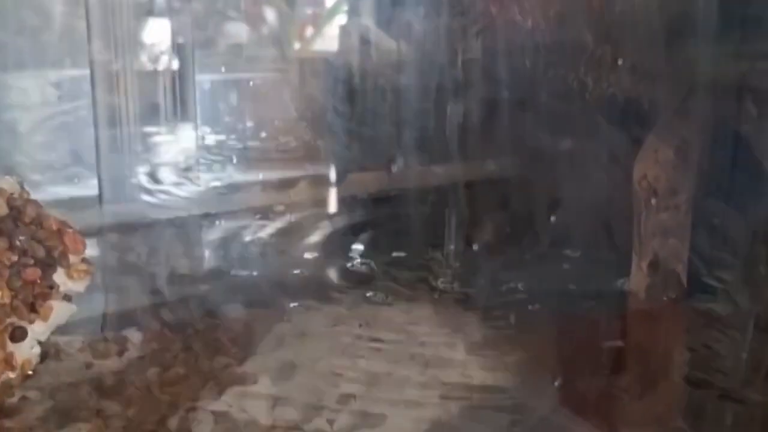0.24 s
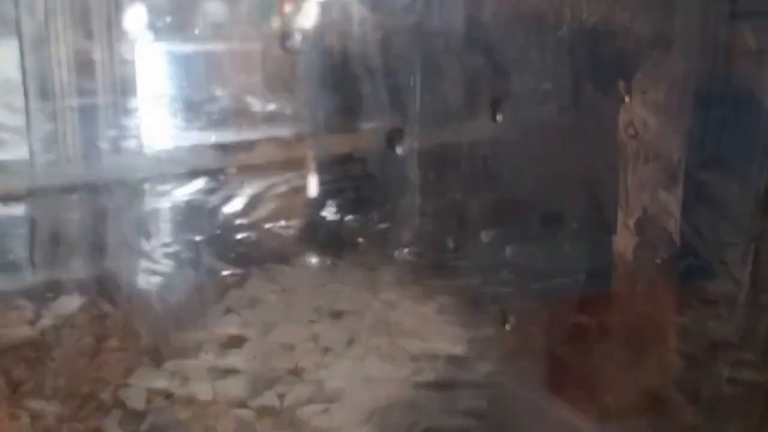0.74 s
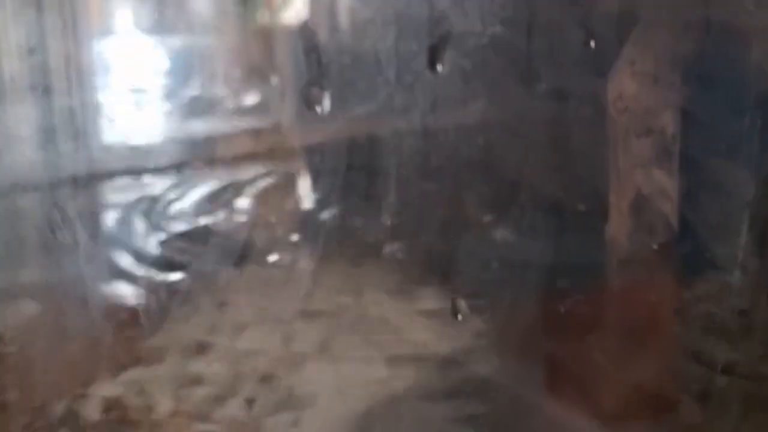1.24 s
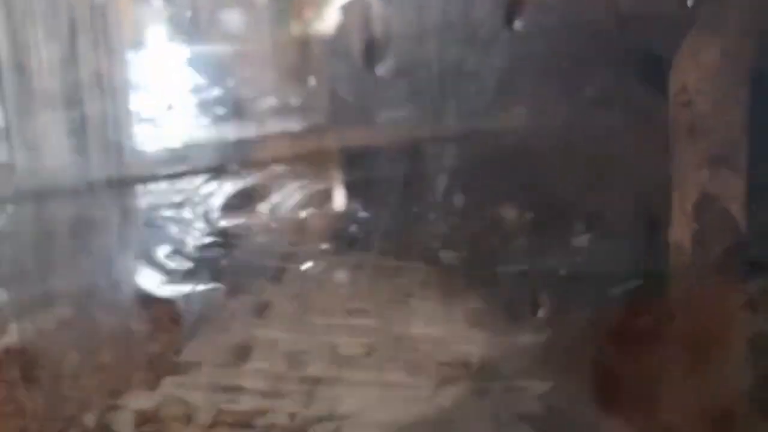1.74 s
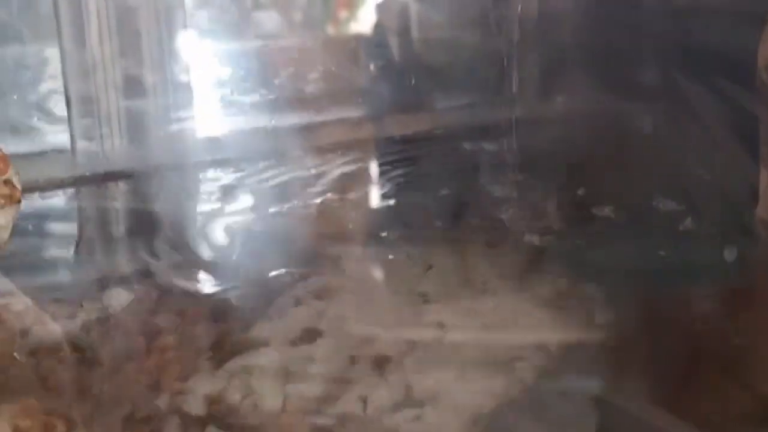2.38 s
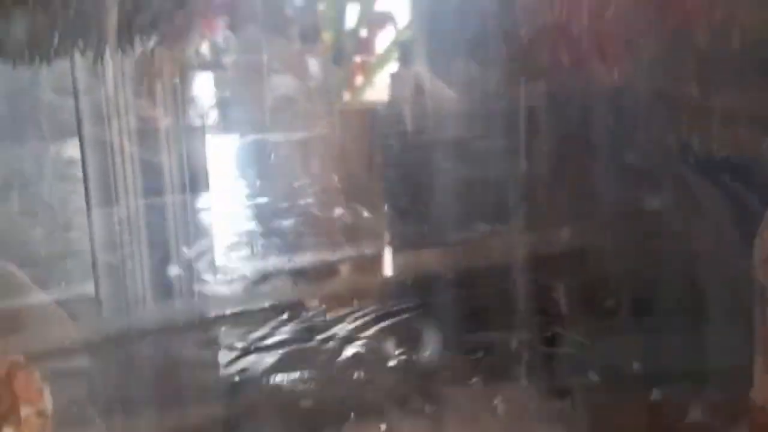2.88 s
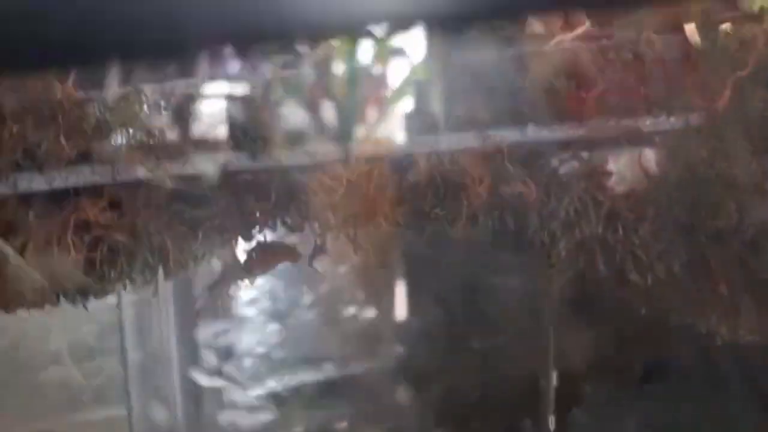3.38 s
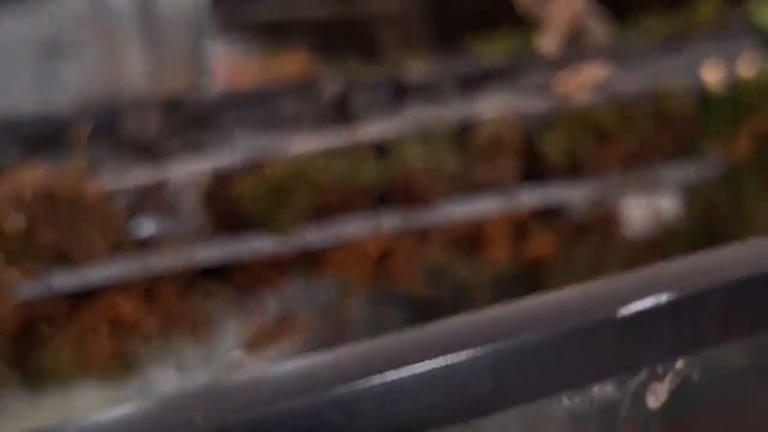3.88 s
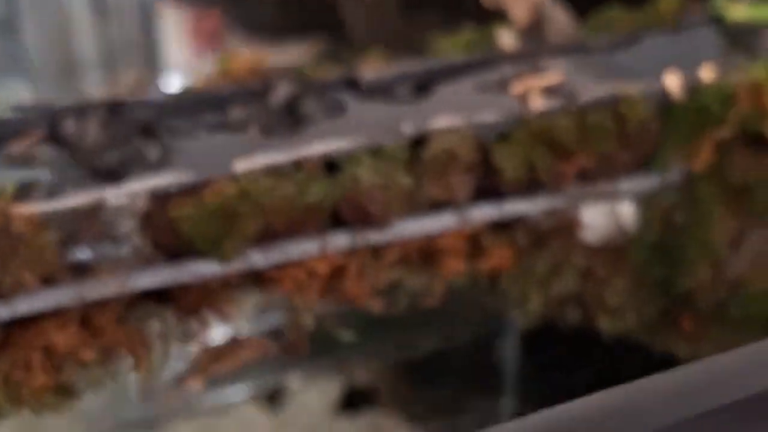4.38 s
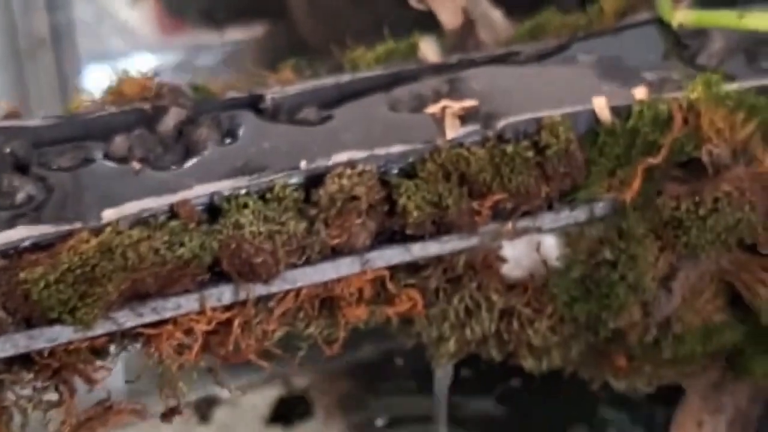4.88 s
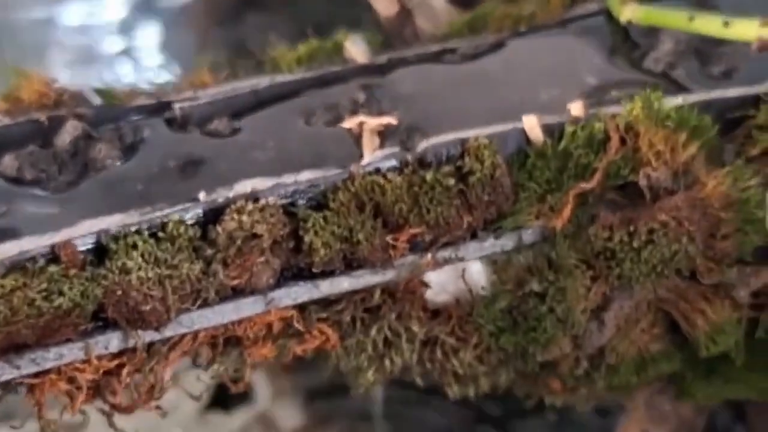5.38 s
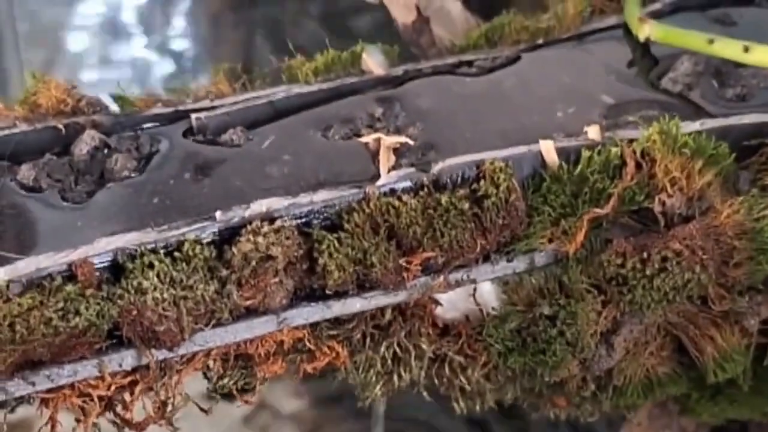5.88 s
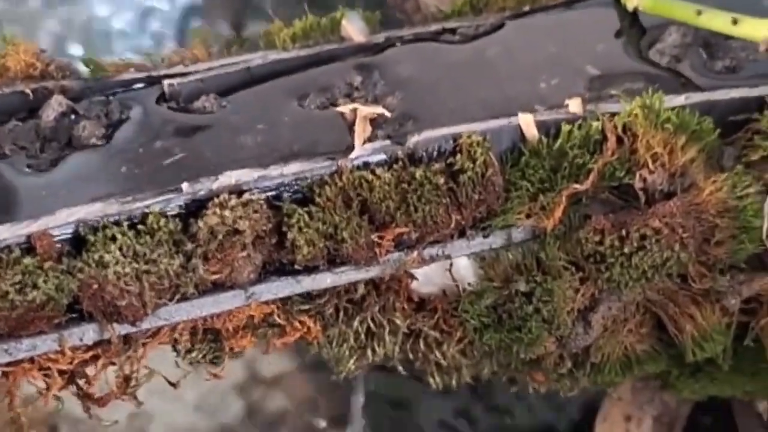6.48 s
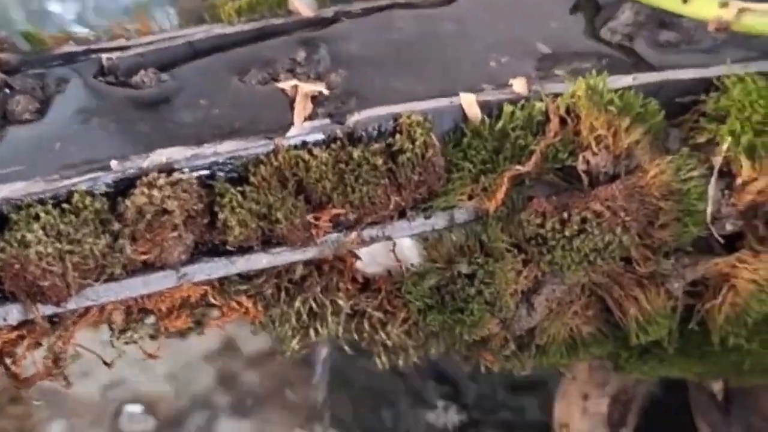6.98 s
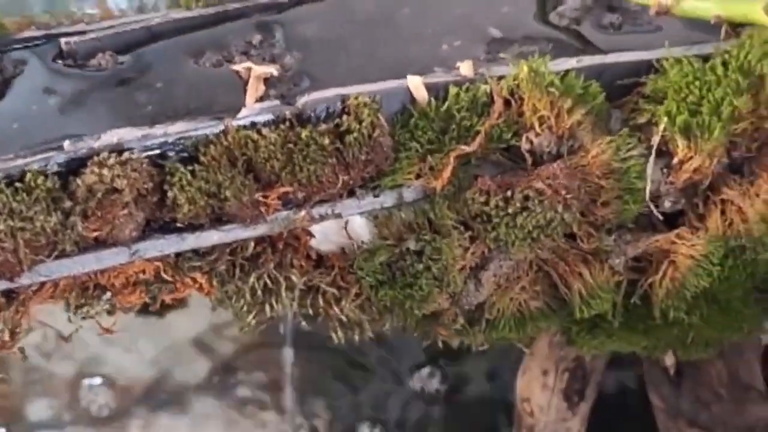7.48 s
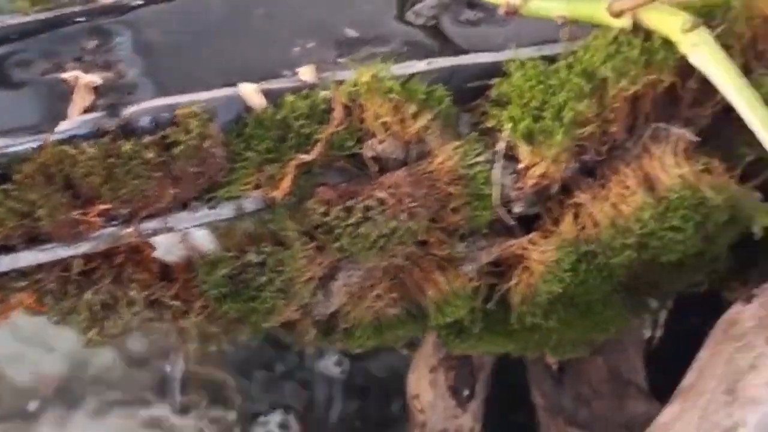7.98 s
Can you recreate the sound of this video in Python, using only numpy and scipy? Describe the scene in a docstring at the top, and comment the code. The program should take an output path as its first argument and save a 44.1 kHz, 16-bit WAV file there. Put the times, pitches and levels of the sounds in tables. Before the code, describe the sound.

A trickle falls into a water tank in a room, heard very near over a quiet, steady pump hum and low rumble. Separate bubbly drops come first, dulled by the glass, with soft thuds from a hand on the microphone and a single hollow knock. After a louder bump and a rub, the dripping turns dense, crisp and spattering, mostly on the left, while the hand ticks the microphone twice on the right.

```python
"""At a glass tank, close up: water trickles in from a mossy ledge, each drop splashing and trapping
bubbles that ring between the walls. A hand-held two-port microphone rises from beside the glass
to above the open top, where the water is brighter. The left port faces the water; the right lies
under the hand, which rubs, bumps and twice ticks the housing. Something hollow is knocked once.
Behind it all, a mains pump hums and the room rumbles."""
import sys
import numpy as np
from scipy import signal
from scipy.fft import rfft, irfft, next_fast_len
from scipy.io import wavfile

SR = 44100
rng = np.random.default_rng(int(sys.argv[2]) if len(sys.argv) > 2 else 0)


def transcribe(signal):
    """Save signal, clipped to [-1, 1], as a 16-bit WAV file at the path in sys.argv[1]."""
    frames = np.atleast_2d(signal).T
    limited = np.clip(frames, -1, 1)
    pcm = np.round(limited * 32767).astype(np.int16)
    wavfile.write(sys.argv[1], SR, pcm)


N = 363384
TIME = np.arange(N) / SR

# The microphone's rise: time_s, hiss_db, openness (0 behind glass, 1 above the tank), rumble_db
# hiss_db is fine water spatter, swelling with the hand's rubbing hiss at about 4.0-4.5 s
MIC_PATH = [(0.0, -68, .6, -68), (.25, -74.5, 0.51, -72), (.45, -75.5, 0.37, -64.5),
            (1.1, -77.5, 0.24, -62.5), (2.0, -74, 0.21, -62.5), (2.8, -82.5, 0.29, -61),
            (3.4, -73.5, 0.53, -61), (4.0, -69, 0.71, -54.5), (4.15, -55.5, 0.76, -47.5),
            (4.42, -59.5, 0.86, -57), (4.65, -65, 0.85, -54.5), (5.2, -70, 0.84, -58),
            (5.65, -64, 0.95, -55.5), (6.0, -72.5, 0.85, -58), (6.9, -68.5, 1, -55.5),
            (7.6, -70.5, 0.77, -59.5), (8.24, -65, 0.98, -57)]
# Single drops: start_s, level_db, pitch_hz, splash_db (4-9 kHz), top_db (above 9 kHz)
DROPS = [(0.071, -40, 2560, -50, -64), (0.2597, -40, 2640, -65, -76), (.5232, -43, 2120, -53.5, -78),
         (1.0423, -51, 1030, -59, -74), (1.2593, -43.5, 1944, -71, -81), (1.3764, -55, 1835, -59, -77),
         (1.5464, -51, 1780, -69, -63), (1.56, -49, 4600, -79, -80), (1.93, -44, 1900, -61, -82),
         (2.0495, -48, 2450, -56, -78), (2.309, -44.5, 2670, -49.5, -72), (2.395, -44.5, 3226, -80, -70),
         (2.4094, -49, 1920, -74, -77), (2.576, -55, 1970, -81, -84), (2.641, -61, 1950, -78, -82),
         (2.673, -59, 1740, -87, -82), (2.715, -61, 1950, -78, -82), (2.78, -56, 1880, -60, -82),
         (2.9087, -41.5, 1976, -59, -86), (2.923, -46, 1740, -66, -83), (2.963, -51, 1760, -59, -71),
         (2.98, -45, 2500, -55, -72), (3.0312, -43, 2610, -54, -81), (3.0587, -50, 4200, -66, -82),
         (3.2213, -53, 4370, -68, -82), (3.25, -42.5, 2420, -54.5, -82), (3.345, -43, 1470, -82, -84),
         (3.4087, -46, 1973, -59, -76), (3.5302, -32, 1445, -53.5, -56), (3.5655, -51, 3630, -72, -78),
         (3.693, -37.5, 2610, -47, -50), (3.7989, -56, 4670, -61, -70), (3.889, -49, 1370, -76, -62),
         (3.904, -51, 1930, -76, -73), (4.0572, -38.5, 1970, -46, -60), (4.135, -50, 1350, -44, -43),
         (4.4007, -36, 6270, -53, -65), (4.5405, -37, 3970, -42, -50), (4.6905, -40, 4810, -65, -84),
         (4.705, -47, 2700, -62, -72), (4.739, -44, 3050, -44, -73), (4.8503, -36, 7170, -51, -51),
         (4.9043, -37, 1784, -53, -74), (4.9427, -41, 6470, -48, -56), (4.976, -43.5, 2140, -63, -72),
         (5.0074, -35, 3990, -48, -55), (5.025, -38, 3500, -51, -70), (5.04, -35, 1695, -45, -50),
         (5.0827, -43, 1316, -45.5, -64), (5.169, -46.5, 7200, -66, -57), (5.227, -49, 2170, -48.5, -60),
         (5.273, -44.5, 2920, -48, -55), (5.3404, -54, 1277, -73, -59), (5.3516, -52, 1940, -82, -72),
         (5.4007, -51, 1940, -41, -39), (5.5393, -37.5, 1700, -40, -55), (5.5748, -38.5, 1880, -40, -38),
         (5.6337, -42.5, 2750, -43, -51), (5.7123, -45, 2960, -71, -71), (5.7464, -39, 960, -44.5, -51),
         (5.84, -48.5, 2260, -67, -69), (5.8566, -46, 2310, -57, -53), (5.878, -44, 4700, -64, -44),
         (5.8986, -34, 3370, -44, -46), (5.945, -48, 4630, -66, -70), (5.969, -46.5, 1810, -59, -63),
         (5.996, -38, 4090, -61, -72), (6.0137, -38.5, 2290, -71, -73), (6.0145, -34.5, 2890, -71, -73),
         (6.0442, -50, 4300, -71, -64), (6.0754, -44, 1740, -72, -62), (6.0966, -33.5, 3170, -71, -69),
         (6.18, -52, 4020, -49, -58), (6.199, -55, 3200, -70, -70), (6.207, -49.5, 1235, -67, -58),
         (6.225, -47, 2100, -47, -44), (6.2398, -31, 6570, -60, -50), (6.3157, -40, 1620, -53, -57),
         (6.3374, -38, 2940, -58, -68), (6.3735, -41, 2790, -53, -73), (6.3885, -35, 3370, -46, -73),
         (6.4699, -42.5, 1230, -76, -65), (6.536, -41, 3280, -52, -69), (6.563, -45, 2260, -43, -76),
         (6.5967, -51, 3010, -68, -60), (6.63, -29, 2790, -34, -44), (6.739, -71, 4530, -55, -74),
         (6.776, -53, 2260, -45.5, -41.5), (6.8, -48, 2970, -43, -64), (6.814, -32.5, 3210, -33.5, -55),
         (6.8197, -46, 5730, -33, -70), (6.849, -41, 4170, -42.5, -47), (6.862, -32.5, 1910, -60, -70),
         (6.8688, -30, 1990, -59, -54), (6.907, -56, 1580, -61, -72), (6.9614, -39.5, 1690, -66, -52),
         (7.002, -46.5, 3880, -51, -51), (7.0582, -51, 1660, -74, -66), (7.098, -48, 2940, -55, -50),
         (7.1297, -37.5, 2190, -50, -70), (7.158, -42, 5070, -69, -77), (7.2408, -43, 2390, -54, -65),
         (7.286, -39, 1120, -44.5, -48), (7.3608, -40.5, 2360, -51, -49), (7.421, -37.5, 3430, -48, -47),
         (7.425, -49, 1250, -70, -70), (7.4603, -43.5, 1146, -60, -56), (7.5508, -42.5, 2130, -52, -53),
         (7.599, -46.5, 1550, -47, -64), (7.644, -40, 2750, -66, -57), (7.6587, -41.5, 2950, -56, -72),
         (7.675, -38, 2740, -41, -67), (7.7394, -43.5, 1190, -70, -47), (7.7632, -40, 3020, -47.5, -57),
         (7.8226, -41.5, 1173, -76, -58), (7.896, -51, 1730, -49.5, -48), (7.9348, -49, 2100, -48, -66),
         (7.963, -42, 3800, -57, -70), (7.993, -43, 2600, -57, -70), (8.004, -44.5, 1890, -57, -67),
         (8.11, -38.5, 1083, -47, -50), (8.1628, -40.5, 2270, -44.5, -54)]
# Droplets bursting near the left port: start_s, level_db, centre_hz
SPITS = [(3.6925, -47, 15100), (3.895, -51, 14700), (3.9938, -48, 14700), (4.8534, -41, 14500),
         (4.9447, -51, 9300), (5.1716, -48, 12600), (5.3413, -34, 14700), (5.449, -57, 14400),
         (5.5388, -46, 13100), (5.6206, -39, 15200), (5.7488, -50, 13100), (5.8875, -39, 12700),
         (6.0691, -48, 15300), (6.1953, -42, 15000), (6.2253, -36, 15800), (6.316, -54, 12400),
         (6.631, -38.5, 13900), (6.776, -53, 15500), (6.8344, -46, 12600), (6.9531, -52, 14200),
         (7.0174, -47, 14400), (7.0828, -48, 13200), (7.2434, -50, 15000), (7.2863, -45, 15100),
         (7.3043, -44, 15000), (7.3712, -44.5, 10900), (7.4205, -42.5, 12500), (7.453, -40, 15000),
         (7.5058, -47.5, 9430), (7.6231, -46, 15100), (7.7373, -35, 15300), (7.8341, -45, 14800),
         (7.9279, -43, 14300), (8.0895, -45, 13000), (8.1618, -49, 12700)]
# Spectrum of the flickering hiss: frequency_hz, level_db
HISS_COLOUR = [(500, -28), (1200, -5.5), (2100, -2), (4000, -4), (7500, -4.5), (9000, -12), (12500, -9),
               (16000, -5.5)]
# Air resonances of the tank at the left port: pitch_hz, width_hz, level_db
TANK_MODES = [(2138, 20, -13.5), (3150, 430, -3), (3357, 230, 3.5), (5240, 1100, 9.5), (7000, 250, -35)]
# The hand's shading of the right port: frequency_hz, gain_db
HAND_SHADE = [(500, -22), (1400, 1.5), (2200, -16.5), (3300, -12.5), (7000, -20), (8400, -25),
              (12500, -6.5), (16000, -10)]
# Strokes of the hand over the housing: start_s, held_s, right_db, left_over_right_db, treble_db
STROKES = [(0.0, 0.29, -48.5, -16, -2.5), (0.133, 0.051, -42.5, -21, 0.0), (.21, 0.063, -46, -27, -1),
           (.395, 0.017, -53.5, -18, 7), (.525, 0.028, -59, -4, -4.5), (.607, 0.019, -58, -17, -6.5),
           (.693, 0.03, -49, -24.5, -1.5), (.815, 0.022, -64, -33.5, -4), (0.927, 0.042, -48.5, -12, -0.5),
           (.98, 0.091, -61, -6, -0.5), (1.389, 0.015, -56, -7, -6), (2.733, 0.11, -57.5, -9, -7),
           (3.06, .15, -61, -19, -12), (3.767, 0.0045, -50, -16, -9.5), (4.068, 0.21, -53, -11, -1),
           (4.27, 0.068, -47, -5, -3.5), (4.37, 0.2, -51.5, -10, -2), (4.6, 0.28, -67, 1, 5.5),
           (5.05, 0.036, -71.5, 8.5, 5)]
# Spectrum of the rubbing: frequency_hz, level_db
RUB_COLOUR = [(100, 12.5), (250, 2.5), (700, 0.5), (1500, 3), (2500, -3.5), (4500, -6), (7000, -15.5),
              (8400, -24.5), (10500, -13), (16000, -12)]
# Bumps of the hand: crest_s, level_db, fall_s
BUMPS = [(0.02, -39.5, 0.025), (.088, -35.5, 0.03), (0.128, -26.5, 0.011), (.239, -54, 0.018),
         (0.297, -45, 0.021), (.608, -40.5, 0.015), (.681, -25.5, 0.016), (.726, -42.5, 0.036),
         (.95, -27, 0.012), (.987, -36.5, 0.011), (1.024, -38, 0.014), (1.384, -35.5, 0.032),
         (1.421, -33, 0.013), (2.643, -44, 0.022), (2.744, -31, .017), (2.797, -38, 0.0088),
         (2.957, -39, .017), (3.765, -30.5, 0.014), (3.816, -42, 0.015), (4.069, -35.5, 0.013),
         (4.115, -41, 0.012), (4.255, -13.5, .017), (4.311, -34, 0.026), (4.365, -38, 0.015),
         (4.431, -34, 0.012), (4.489, -26.5, 0.0096), (4.541, -31, 0.024), (4.791, -38, 0.013),
         (5.014, -36.5, 0.012), (5.072, -39, 0.012), (5.422, -44, .017), (5.479, -47, .008),
         (5.597, -29.5, 0.0065), (5.661, -37.5, 0.0069), (6.61, -37.5, 0.013), (6.974, -43, .014),
         (7.008, -38, 0.0081), (7.949, -34.5, 0.011)]
# Ticks of the housing: start_s, level_db, left_over_right_db
TICKS = [(5.4157, -15, -18), (5.589, -25, -10)]
# Modes of the housing: pitch_hz, level_db, t60_s
HOUSING_MODES = [(530, -19, 0.0089), (1970, -10.5, 0.0076), (2680, -6, 0.0027), (5150, -8.5, 0.0015),
                 (6940, -12, 0.0047), (12200, -17.5, 0.0064)]
# Contacts of one rattling knock: start_s, level_db
KNOCK_CONTACTS = [(2.309, -19.5), (2.317, -19.5), (2.332, -9.5), (2.348, -56), (2.385, -30.5)]
# Modes of the hollow body: pitch_hz, level_db, t60_s (before extra damping)
HOLLOW_MODES = [(136.6, -25.5, 0.41), (209, -12.5, 0.17), (287, -16, 0.26), (331, -17, 0.27),
                (363, 0, 0.18), (491, -21.5, 0.14), (565, -23, 0.18), (680, -6.5, 0.047),
                (1039, -32, 0.145)]
# Pump hum at the left port: harmonic, glass_db, open_db, right_below_left_db, glass_gain (signed)
PUMP_HARMONICS = [(1, -69, -64, -6.5, 0.9), (2, -61, -53.5, 3, 0.8), (3, -72, -57.5, 3, -1.6),
                  (4, -60, -51, 10, -0.43), (5, -106, -64.5, 14, 0.92), (6, -66.5, -72, 14.5, 0.83),
                  (8, -73.5, -68.5, 5.5, 0.82), (12, -97, -70, 54, -1.4)]
# Spectrum of the room's rumble: frequency_hz, level_db
ROOM_COLOUR = [(25, -6.5), (45, 4.5), (70, 3.5), (140, -5), (200, -2.5), (300, -8), (420, -12),
               (800, -18.5), (1050, -32.5), (2500, -69)]

BUBBLE_T60_S = 0.021   # for a 2 kHz drop at -43 dB
MAIN_RISE, SMALL_RISE = .08, .06   # a bubble's pitch climb, share per half t60
SPURT_BEFORE_S, SPURT_AFTER_S = 0.024, 0.028
RUB_RISE_DB_PER_S, RUB_SAG_DB_PER_S, RUB_FALL_DB_PER_S = 600, 15, 297
BUMP_HZ, MAINS_HZ, CUTOFF_HZ = 70.4, 60.1, 16350


def water(hiss_db, openness):
    """Water falls close by and echoes in the tank; the hand shades the right port from its treble."""
    direct = drops(openness)
    stream = trickle(openness) + sparkle(hiss_db, per_s=30)
    echoes = amp(-5.5) * tank(direct[0] + stream, mid_t60=0.19, edge_t60=0.12)
    left, right = echoes + flickering_hiss(hiss_db + 8, openness) + stream
    right = np.roll(colour(right, HAND_SHADE), 22)   # farther off: 0.5 ms later
    return direct + spits() + [left, right]


def drops(openness):
    """Each drop splashes, traps a main bubble and tears off two smaller ones beside it."""
    s, db, hz, splash_db, top_db = np.transpose(DROPS)
    t60 = BUBBLE_T60_S * (hz / 2000) ** -.55 * np.exp(-0.027 * (db + 43))   # high or loud dies faster
    shade_db = 1 + 10.5 * np.log2(hz / 2000) + 15.5 * np.interp(s, TIME, openness)   # left over right
    noise = rng.standard_normal((len(s), 1600))
    pick = rng.random((len(s), 5))
    wash_hz = 4200 + 2000 * pick[:, 4]
    wash = [band(band(row, 3000, 8500), f * 0.82, f * 1.237) for row, f in zip(noise, wash_hz)]
    top = band(band(noise, 9000, 19000), 8600, 19000)
    smack = [rms_one(band(row, f * .69, f * 1.31)) for row, f in zip(noise, hz)]
    splash = (amp(splash_db + 7)[:, None] * wash * swell(0.0032, 0.021)
              + amp(top_db - 2.5)[:, None] * top * swell(0.0061, 0.05)
              + amp(db - 11.5)[:, None] * smack * swell(0.0022, 0.045))
    tone = amp(db - 3)[:, None] * bubbles(hz, t60, MAIN_RISE)
    s = s - 0.0005   # a drop swells in just before it is heard
    out = np.array([place(s, tone + splash, np.ones(len(s))),
                    place(s + 0.00049, tone, amp(-shade_db))])
    for k, (low, high) in enumerate([(.75, 0.936), (1.1, 1.3)]):   # pitch ratios to the main bubble
        side = bubbles(hz * (low + (high - low) * pick[:, k]), 0.6 * t60, SMALL_RISE)
        late = s + .008 * pick[:, k + 2]
        out += [place(late, side, amp(db - 15.5)), place(late + 0.00045, side, amp(db - 8 - shade_db))]
    return out


def bubbles(hz, t60, rise):
    """A trapped bubble swells in and climbs in pitch as it dies."""
    t = np.arange(1600) / SR
    hz, t60 = hz[:, None], np.clip(t60, .004, .1)[:, None]
    phase = 2 * np.pi * hz * (t + rise * t ** 2 / t60) + 2 * np.pi * rng.random(hz.shape)
    return swell(.003, t60) * np.sin(phase)


def trickle(openness):
    """Gurgle and patter, dulled behind the glass; a thin thread plinking near 2 kHz; high droplets."""
    deep = np.transpose(DROPS)[2] < 1500   # Hz; deep drops feed the gurgle, the rest the patter
    gurgle_db = spurts(deep, -76.5 + 10 * openness + 1.8 * drift(3.9))
    patter_db = spurts(~deep, -70.5 + 7 * openness + 2.84 * drift(1.33))
    gurgle = swarm(gurgle_db - 6, 1034, 1490, per_s=150, cycles=16, spread_db=6, crowding=1.08)
    patter = swarm(patter_db - 9.5, 1733, 6230, per_s=420, cycles=16, spread_db=5, crowding=2.16)
    bright = gurgle + patter
    dull = band(band(bright, 300, 1880), 300, 1880)
    heard = dull + np.minimum(openness, 1) ** 2.17 * (bright - dull)
    plink_db, droplet_db = -72.5 + 5.5 * openness, -88 + 20.5 * openness
    plinks = swarm(plink_db, 1600, 2500, per_s=60, cycles=22, spread_db=2.5, crowding=1.2)
    droplets = swarm(droplet_db, 2510, 7000, per_s=45, cycles=28, spread_db=3, crowding=1.49)
    return heard + plinks + droplets


def spurts(chosen, between_db):
    """Level of the trickle in dB: a quiet base, and a swell around each chosen drop."""
    s, db = np.transpose(DROPS)[:2]
    t = np.arange(-SR // 4, SR // 4) / SR
    shape = np.exp(-(t / np.where(t < 0, SPURT_BEFORE_S, SPURT_AFTER_S)) ** 2)
    swells = place(s[chosen] - .25, np.tile(shape, (np.sum(chosen), 1)), amp(db[chosen] - 13))
    return 20 * np.log10(swells + amp(between_db))


def swarm(level_db, low_hz, high_hz, per_s, cycles, spread_db, crowding):
    """Many small bubbles ring at random times and overlap."""
    born = np.flatnonzero(rng.random(N) < per_s / SR)
    pick = rng.random((len(born), 3))
    hz = low_hz * (high_hz / low_hz) ** pick[:, 0] ** crowding   # large bubbles are the more common
    gains = amp(-spread_db * np.log(.03 + pick[:, 1]))
    grains = bubbles(hz, cycles * (.5 + pick[:, 2]) / hz, SMALL_RISE)
    return amp(level_db) * rms_one(place(born / SR, grains, gains))


def spits():
    """Droplets burst near the left port, each a few milliseconds of noise round its own centre."""
    s, db, hz = np.transpose(SPITS)
    noise = band(rng.standard_normal((len(s), 1600)), 30, 2300)
    carrier = np.cos(2 * np.pi * hz[:, None] * np.arange(1600) / SR)
    bursts = np.array([rms_one(row) for row in noise]) * carrier * swell(0.00055, 0.013)
    return place(s, bursts, amp(db + 1)) * amp([[0], [-29]])


def sparkle(level_db, per_s):
    """Droplets thrown up by the splashes land as tiny bright spits."""
    born = np.flatnonzero(rng.random(N) < per_s / SR)
    noise = rng.standard_normal((len(born), 1600))
    pick = rng.random((len(born), 2))
    grains = np.where(pick[:, :1] < .5, band(noise, 13900, 20700), band(noise, 3840, 5350))
    gains = amp(-3 * np.log(.05 + pick[:, 1]))
    return amp(level_db) * rms_one(place(born / SR, grains * swell(0.0031, 0.011), gains))


def flickering_hiss(level_db, openness):
    """Fine water spatter, swelling with the hand's rubbing hiss at about 4.0-4.5 s."""
    hiss = rms_one(colour(rng.standard_normal((2, N)), HISS_COLOUR))
    shared, depth = drift(12), 0.41 + .7 * openness   # deeper flicker above the open top
    low, middle = band(hiss, 100, 3500), band(hiss, 3400, 8300)
    return amp(level_db) * sum(part * amp(depth * (2.35 * shared + 2.3 * drift(11)))
                               for part in (low, middle, hiss - low - middle))


def tank(x, mid_t60, edge_t60):
    """Dense echoes between the glass walls, unlike at each port; the air resonates at the left one."""
    t = np.arange(SR // 3) / SR
    noise = rng.standard_normal((2, len(t)))
    mid = band(noise, 300, 4700)
    tail = mid * amp(-60 * t / mid_t60) + (noise - mid) * amp(-60 * t / edge_t60)
    tail /= np.sqrt(np.sum(tail ** 2, axis=1, keepdims=True))
    wet = signal.fftconvolve(x[None], tail, axes=1)[:, :N]
    for hz, width_hz, db in TANK_MODES:
        wet[0] += amp(db - 28.5) * ring(x, hz, 3.3 / width_hz)
    return wet


def hand_rub():
    """Skin slides on the housing; a finger over the right port forms a small cavity."""
    rub_db, pan_db, treble_db = np.transpose(STROKES)[2:]
    friction = rms_one(colour(rng.standard_normal((2, N)), RUB_COLOUR)) * amp(5 + 2 * drift(19))
    cavity = band(friction[1], 2390, 3730) * strokes(rub_db + treble_db - 24 - 1.07 * pan_db)
    low = band(friction, 30, 2000)
    rub = sum(part * [strokes(db + pan_db), strokes(db)]
              for part, db in [(low, rub_db), (friction - low, rub_db + treble_db)])
    return rub + cavity * [[0], [1]]


def strokes(db):
    """Each stroke rises, sags while held and falls; their powers add."""
    s, held_s = np.transpose(STROKES)[:2, :, None]
    down_db = (RUB_RISE_DB_PER_S * np.maximum(s - TIME, 0)
               + RUB_SAG_DB_PER_S * np.maximum(TIME - s, 0)
               + RUB_FALL_DB_PER_S * np.maximum(TIME - s - held_s, 0))
    return np.sqrt(np.sum(amp(2 * (db[:, None] - down_db)), axis=0))


def hand_bumps():
    """The hand bumps the right port: low thuds that start with a creak and sag in pitch."""
    s, db, fall_s = np.transpose(BUMPS)
    t = np.arange(-900, 2600) / SR
    shape = np.exp(-(t / np.where(t < 0, .009, fall_s[:, None])) ** 2)
    sag = t - 0.005555 * np.exp(-(t + 0.0125) / 0.00313)
    thuds = shape * np.sin(2 * np.pi * (BUMP_HZ * sag + rng.random((len(s), 1))))
    creak = band(rng.standard_normal(thuds.shape), 79, 246) * np.exp(-((t + 0.004) / 0.0097) ** 2)
    snap = band(rng.standard_normal(thuds.shape), 250, 870) * np.exp(-((t + 0.0053) / 0.0053) ** 2)
    creak += amp(-21.5) * (.017 / fall_s[:, None]) ** 2.43 * snap   # short bumps are harder
    return place(s - 900 / SR, thuds + amp(6.5) * creak, amp(db + 2)) * amp([[-24], [0]])


def housing_ticks():
    """Sharp taps of the hand ring the microphone's housing."""
    out = np.zeros((2, N))
    for s, db, pan_db in TICKS:
        click = np.zeros(N)
        click[round(s * SR)] = amp(db)
        tick = sum(amp(level_db) * ring(click, hz, t60) for hz, level_db, t60 in HOUSING_MODES)
        out += tick * amp([[pan_db / 2], [-pan_db / 2]])
    return out


def knock():
    """A few soft contacts ring a hollow body, a little to the left, with a faint scuff."""
    blows = np.zeros(N)
    for s, db in KNOCK_CONTACTS:
        blows[round(s * SR)] = amp(db)
    soft = np.convolve(blows, np.hanning(90) / 45)[:N]   # a contact lasts about 2 ms
    body = sum(amp(db - 1) * ring(soft, hz, 0.84 * t60) for hz, db, t60 in HOLLOW_MODES)
    onsets = np.convolve(blows, np.hanning(500) / 250)[:N]
    dying = signal.lfilter([1], [1, -amp(-60 / (.3 * SR))], onsets)
    grit = rng.standard_normal(N)
    scuff = (band(grit, 370, 1580) + amp(-19) * band(grit, 1610, 5700)) * dying
    return (band(body, 78, 3000) + amp(-32) * scuff) * amp([[1.5], [-1.5]])


def pump(openness):
    """The pump hums at mains harmonics; a negative glass_gain gives one a null on the way up."""
    out = np.zeros((2, N))
    for harmonic, glass_db, open_db, right_below_db, glass_gain in PUMP_HARMONICS:
        height = glass_gain * amp(glass_db) * (1 - openness) + amp(open_db) * openness
        phase = 2 * np.pi * (harmonic * MAINS_HZ * TIME + rng.random())
        waver = np.sqrt(2) * amp(1.3 * drift(2.5))
        out[0] += height * waver * np.sin(phase)
        out[1] += np.abs(height) * amp(-right_below_db) * waver * np.sin(phase + 0.69)
    return out


def room_tone(rumble_db):
    """Low rumble, partly shared by the ports, and the microphone's own hiss."""
    shared, *own = rng.standard_normal((3, N))
    rumble = rms_one(colour(0.66 * shared + np.array(own), ROOM_COLOUR))
    hiss = colour(rng.standard_normal((2, N)), [(1000, 6), (8600, -11.5), (12500, -2), (16000, -33)])
    return amp(rumble_db + 3.5) * rumble * amp([[0.5], [-0.5]]) + amp([[-76], [-75]]) * rms_one(hiss)


def amp(db):
    return 10 ** (np.asarray(db) / 20)


def rms_one(x):
    return x / np.sqrt(np.mean(x ** 2) + 1e-20)


def band(x, low_hz, high_hz):
    return signal.sosfilt(signal.butter(2, [low_hz, high_hz], "band", fs=SR, output="sos"), x)


def colour(x, points):
    """Shapes the spectrum by points of frequency_hz, gain_db."""
    hz, db = np.transpose(points)
    size = next_fast_len(N)
    grid = np.log(np.arange(1, size // 2 + 2) * SR / size)
    return irfft(rfft(x, size) * amp(np.interp(grid, np.log(hz), db)), size)[..., :N]


def drift(rate_hz):
    """Slow random wander, rms 1."""
    r = np.exp(-80 * np.pi * rate_hz / SR)
    slow = signal.lfilter([1], [1, -2 * r, r * r], rng.standard_normal(N // 40 + 2002))[2000:]
    return np.interp(np.arange(N) / 40, np.arange(len(slow)), rms_one(slow))


def ring(clicks, hz, t60):
    """A unit click sets a sine of height 1 ringing."""
    r, w = amp(-60 / (t60 * SR)), 2 * np.pi * hz / SR
    return signal.lfilter([0, np.sin(w)], [1, -2 * r * np.cos(w), r * r], clicks + 1e-18)


def swell(attack_s, t60):
    """Soft rise, then decay; crest 1."""
    t = np.arange(1600) / SR
    shape = (1 - np.exp(-t / attack_s)) ** 2 * amp(-60 * t / t60)
    return shape / shape.max(axis=-1, keepdims=True)


def place(s, grains, gains):
    """Sums grains (rows) at their times."""
    at = np.clip(np.round(s * SR).astype(int)[:, None] + np.arange(grains.shape[1]), 0, N)
    return np.bincount(at.ravel(), (grains * gains[:, None]).ravel(), N + 1)[:N]


def scene():
    """What reaches the two ports as the microphone rises, handling noise included."""
    time_s, *columns = np.transpose(MIC_PATH)
    hiss_db, openness, rumble_db = [np.interp(TIME, time_s, column) for column in columns]
    surroundings = water(hiss_db, openness) + pump(openness) + room_tone(rumble_db)
    return surroundings + hand_rub() + hand_bumps() + housing_ticks() + knock()


def record(dry):
    """A low cut at 40 Hz and a steep cut of the very top."""
    lean = signal.sosfilt(signal.butter(4, 40, "high", fs=SR, output="sos"), dry)
    return signal.sosfilt(signal.cheby2(24, 60, CUTOFF_HZ, fs=SR, output="sos"), lean)


dry = scene()
out = record(dry)
transcribe(out)
```